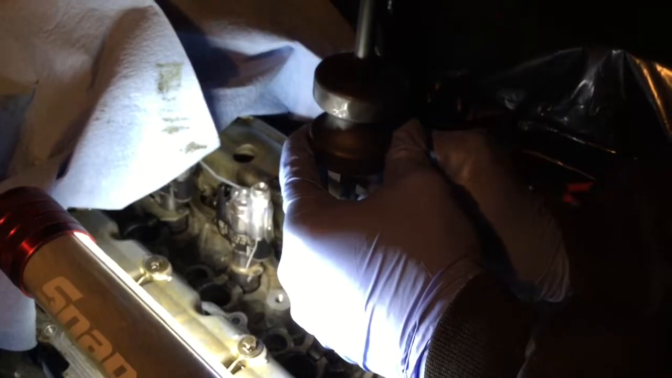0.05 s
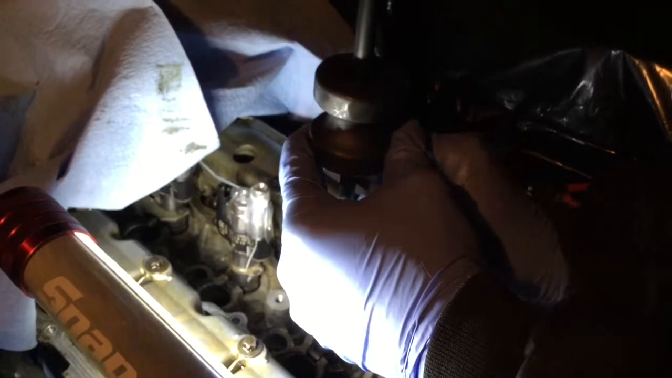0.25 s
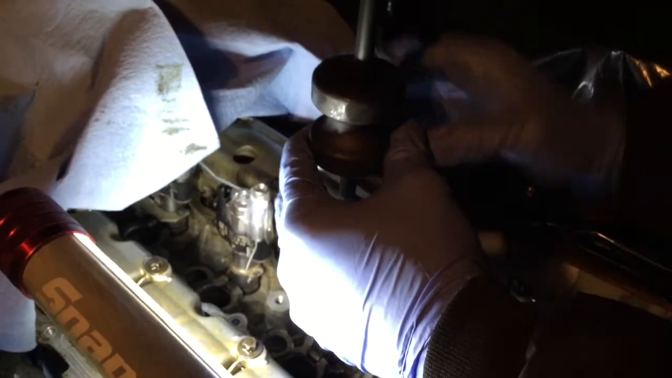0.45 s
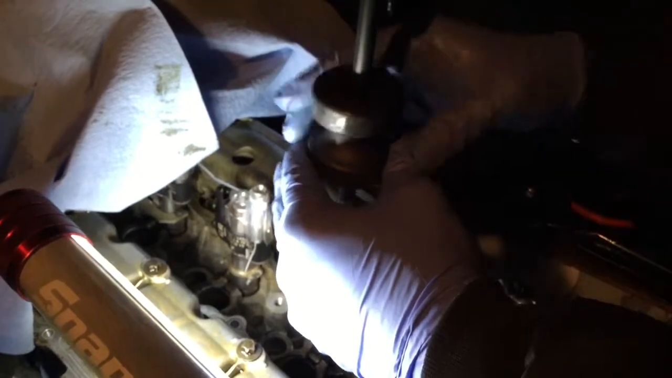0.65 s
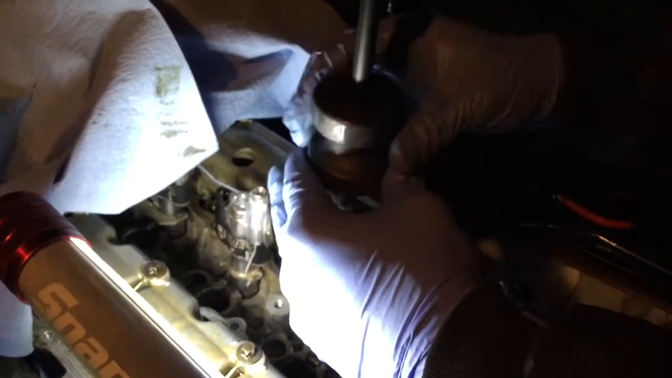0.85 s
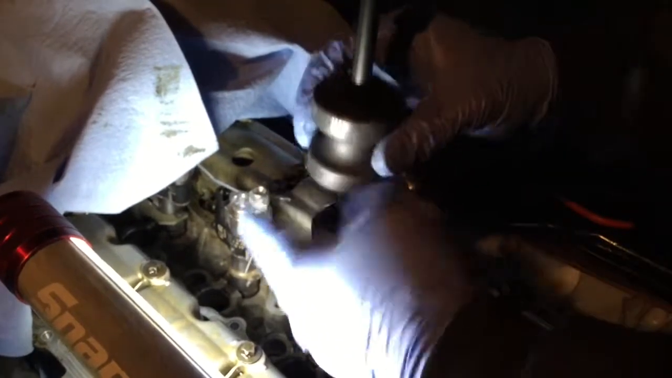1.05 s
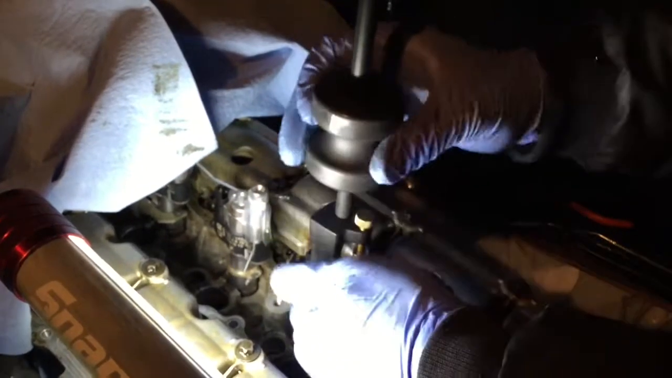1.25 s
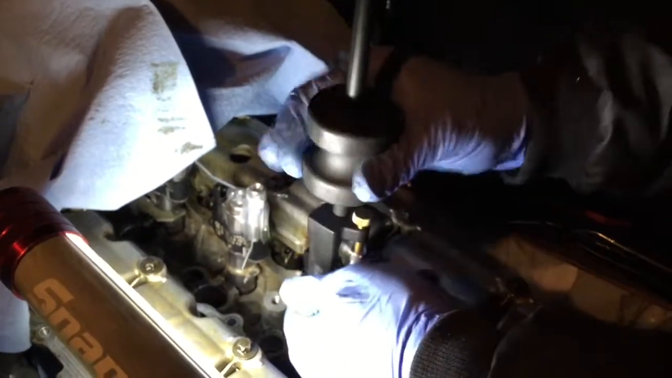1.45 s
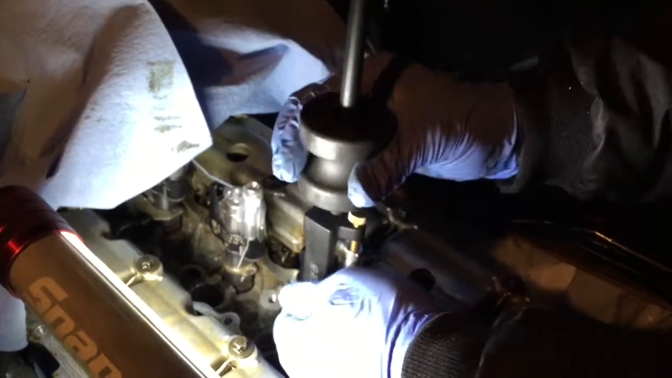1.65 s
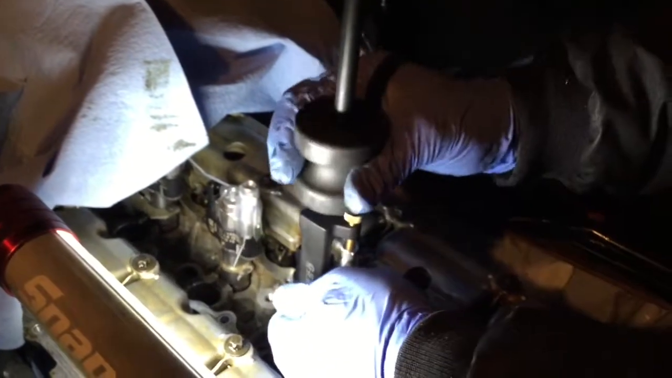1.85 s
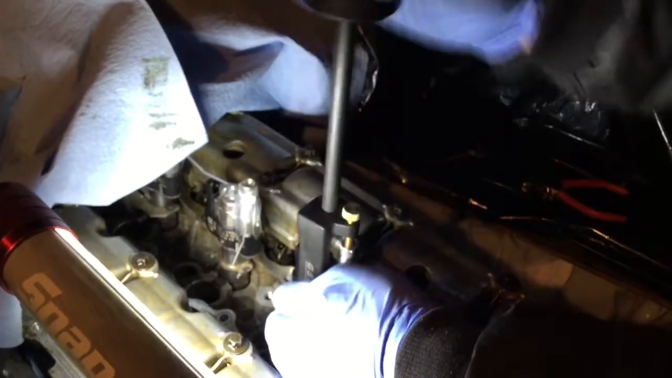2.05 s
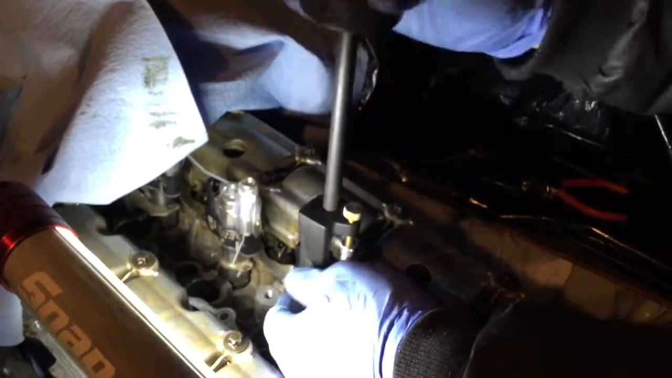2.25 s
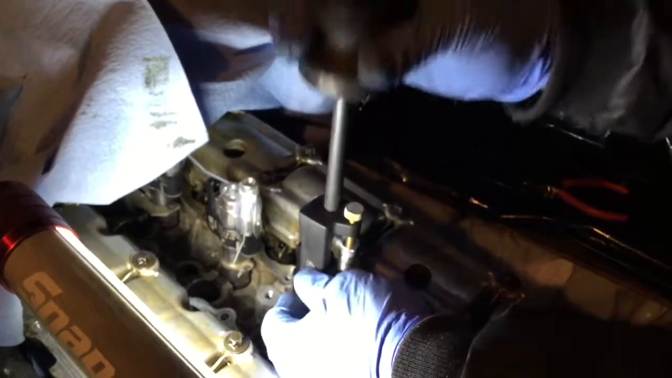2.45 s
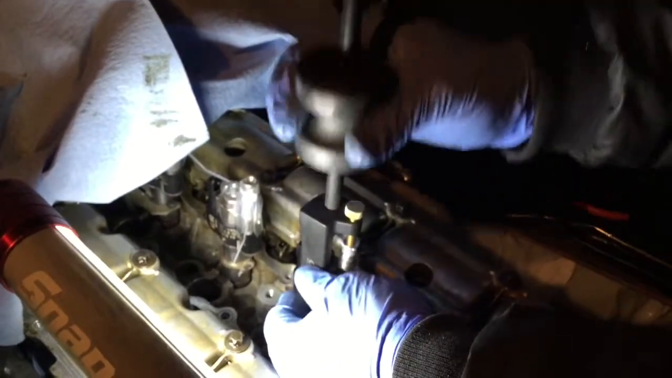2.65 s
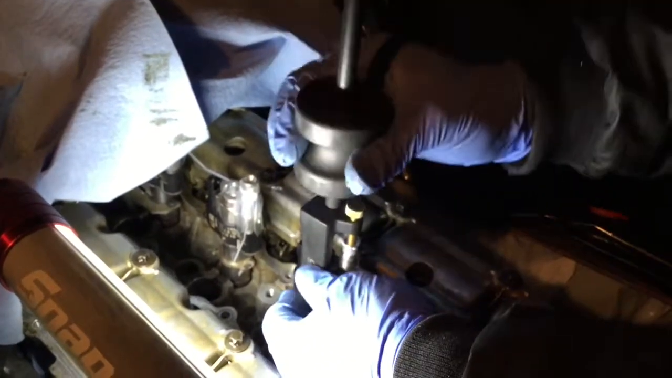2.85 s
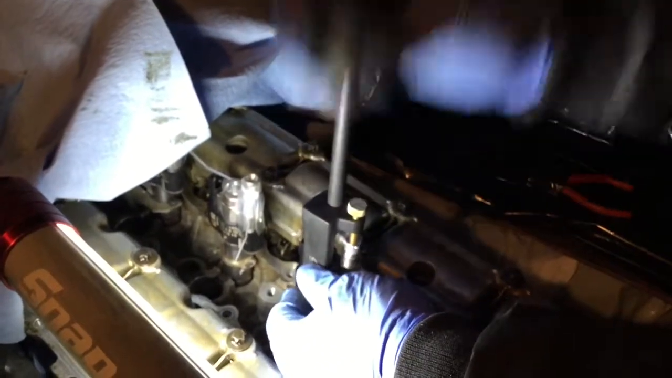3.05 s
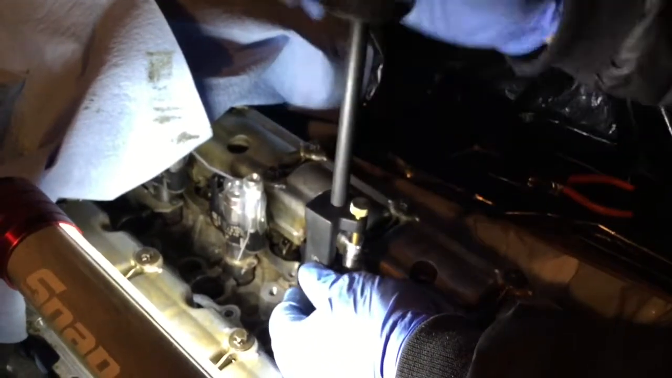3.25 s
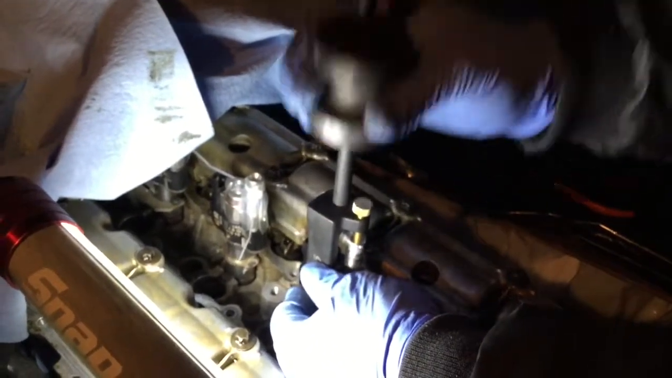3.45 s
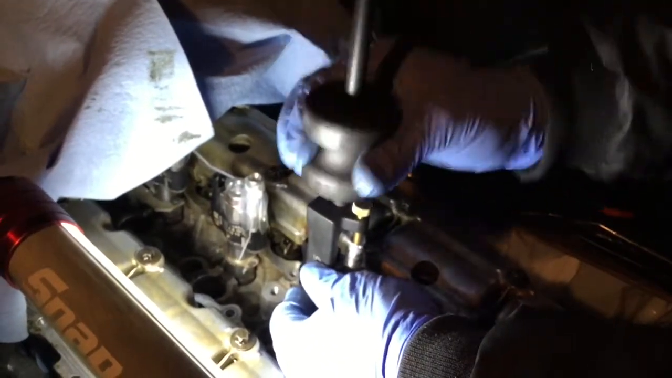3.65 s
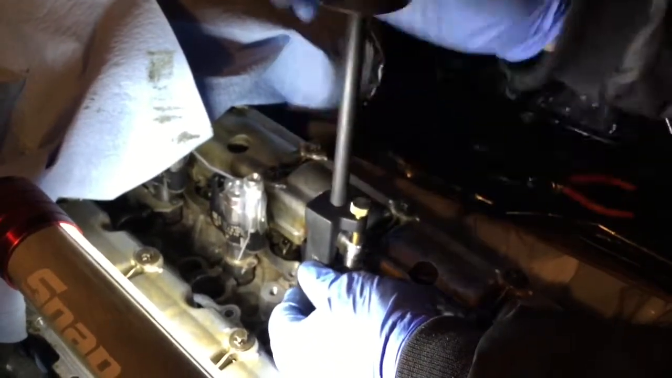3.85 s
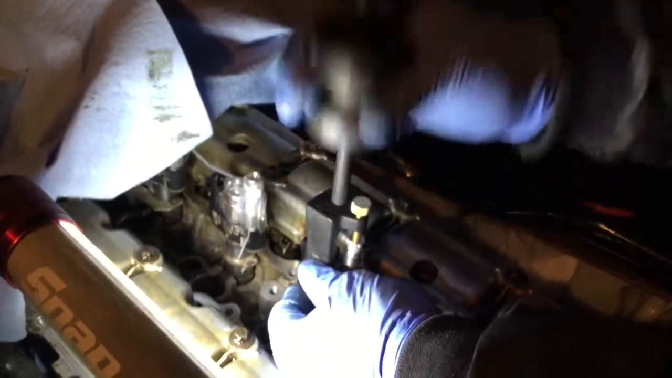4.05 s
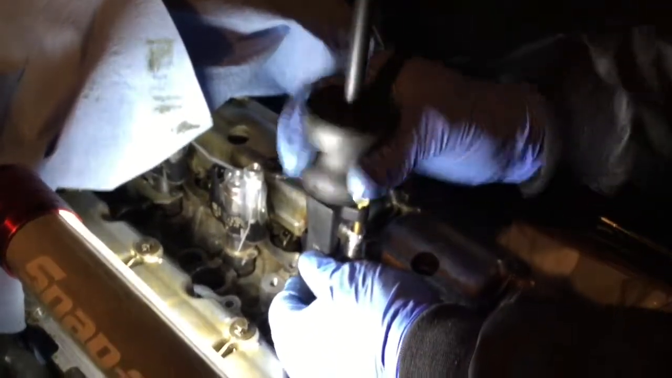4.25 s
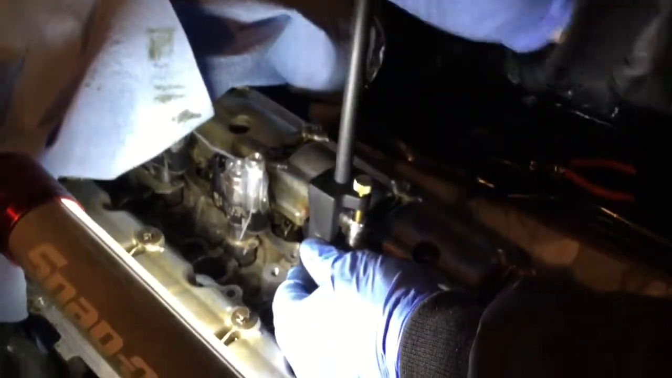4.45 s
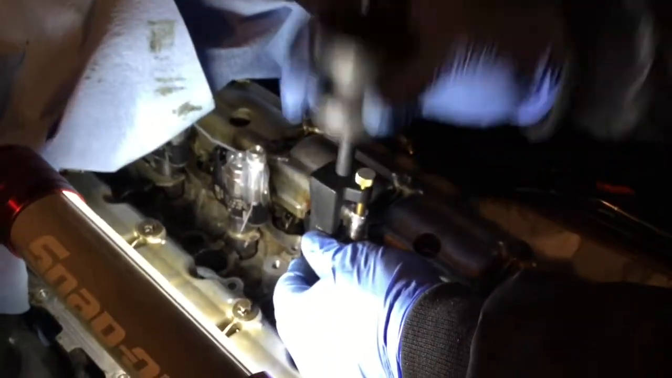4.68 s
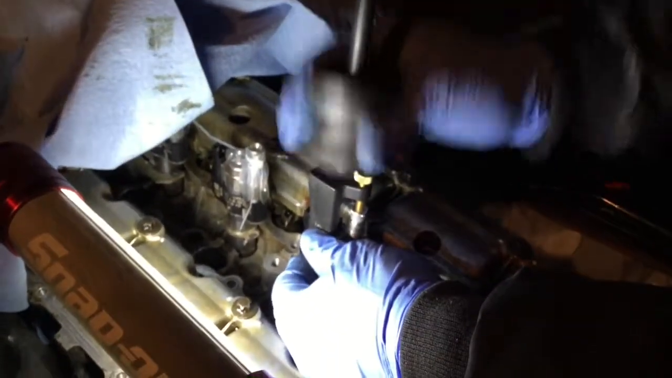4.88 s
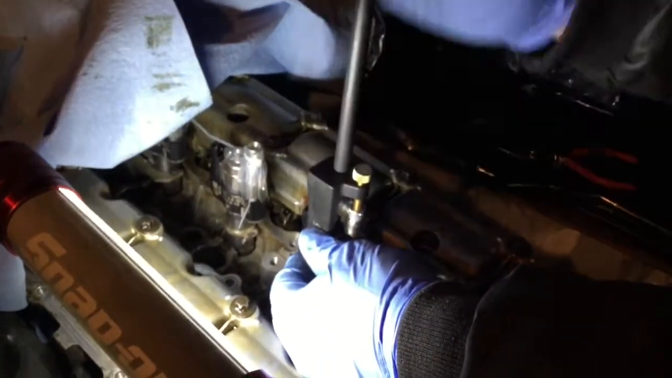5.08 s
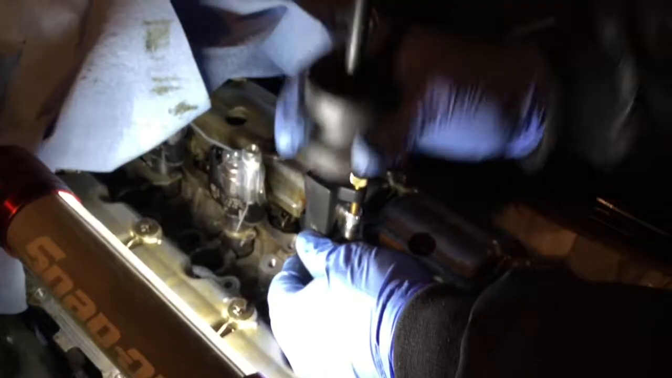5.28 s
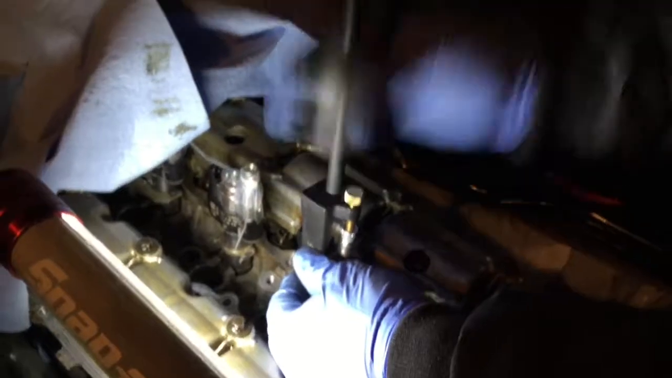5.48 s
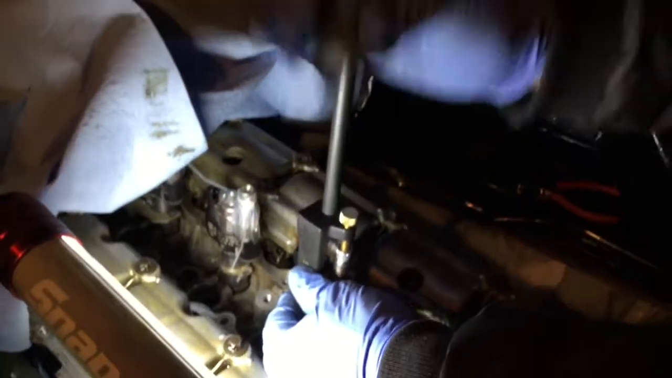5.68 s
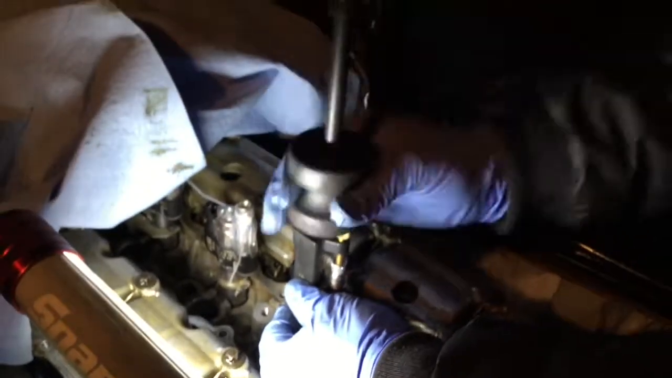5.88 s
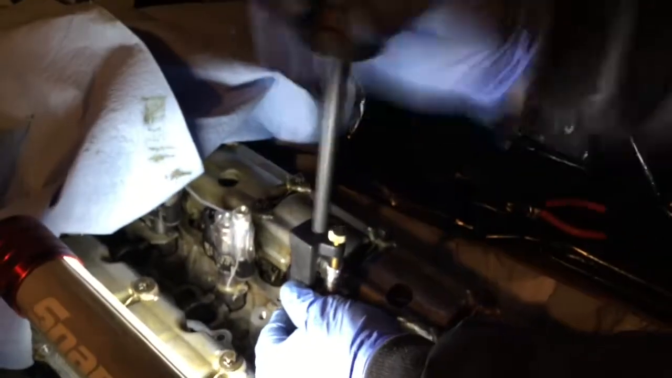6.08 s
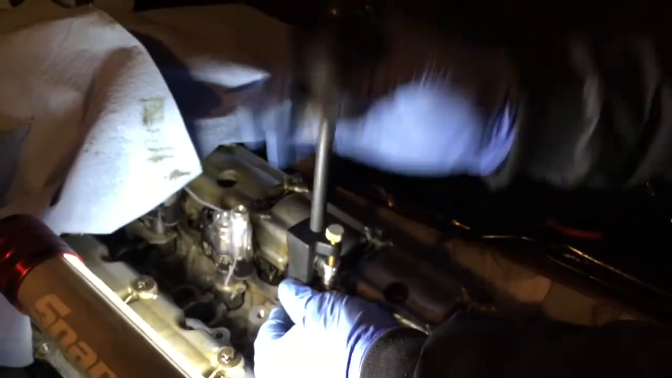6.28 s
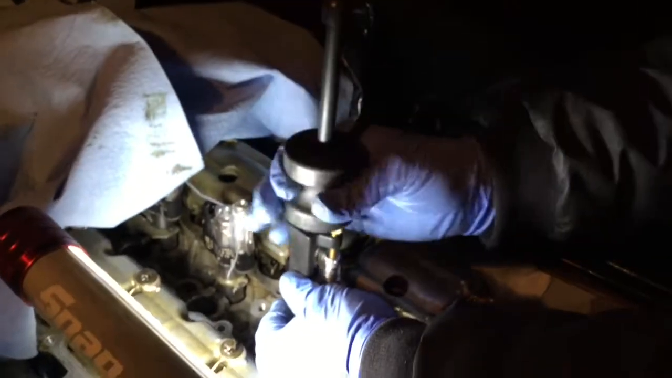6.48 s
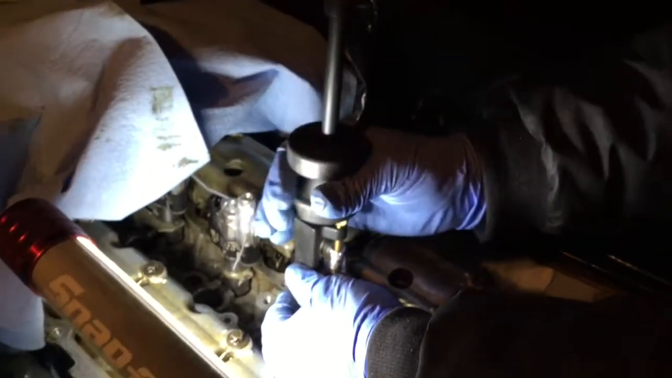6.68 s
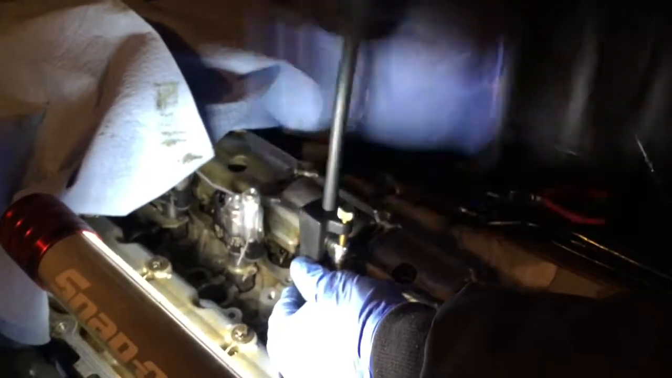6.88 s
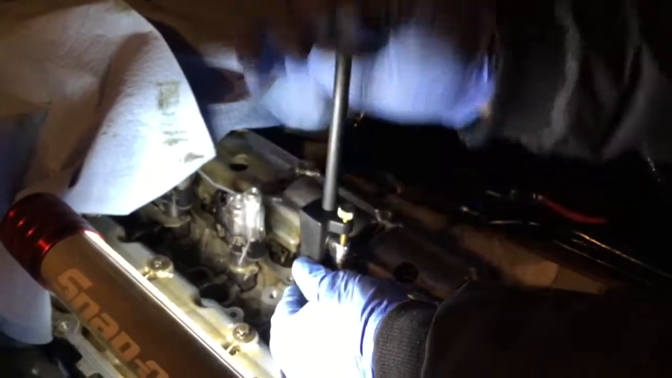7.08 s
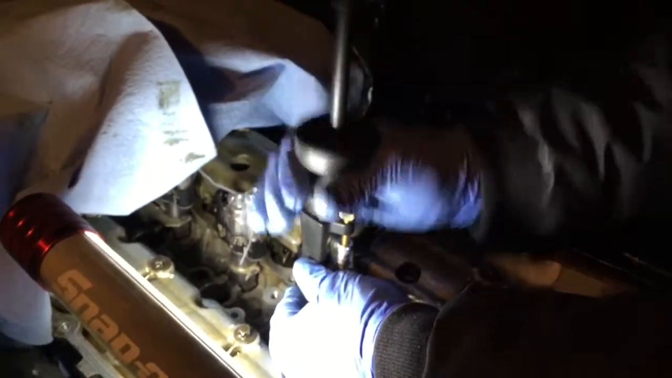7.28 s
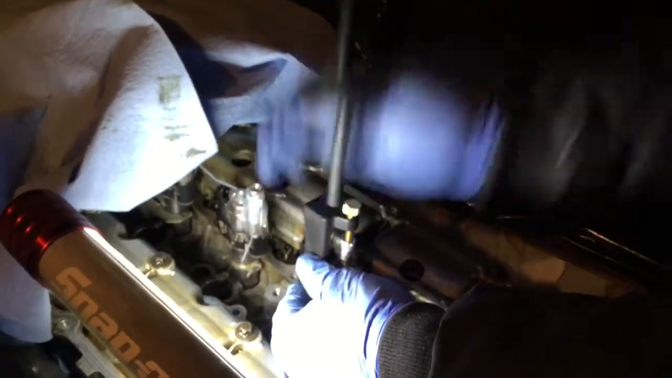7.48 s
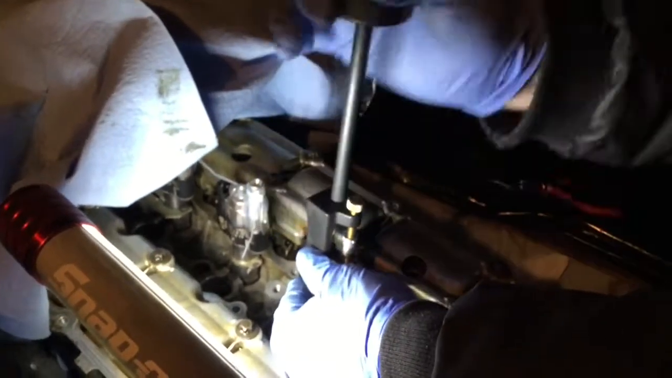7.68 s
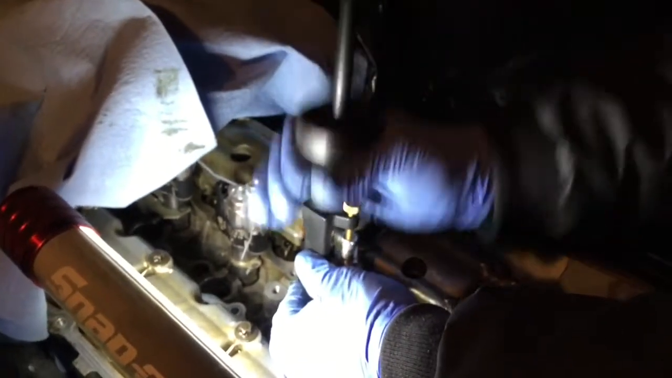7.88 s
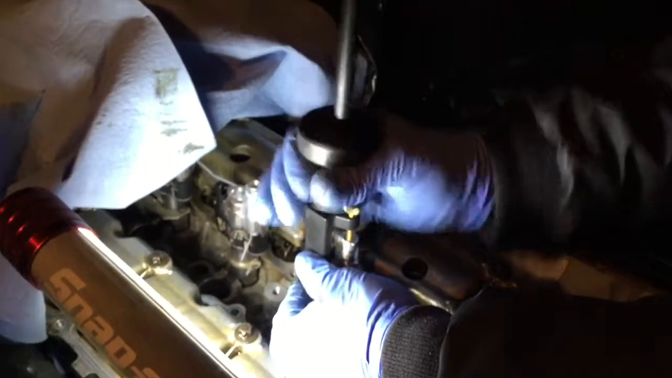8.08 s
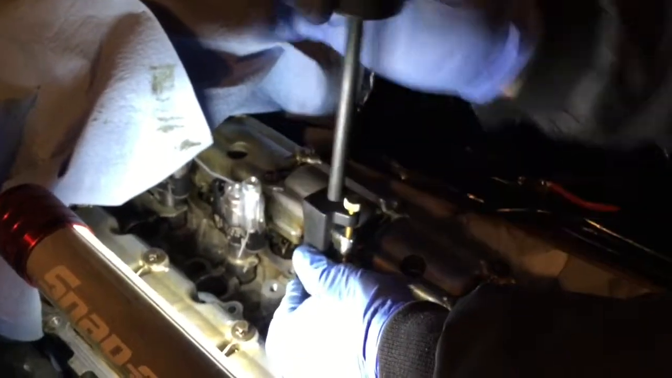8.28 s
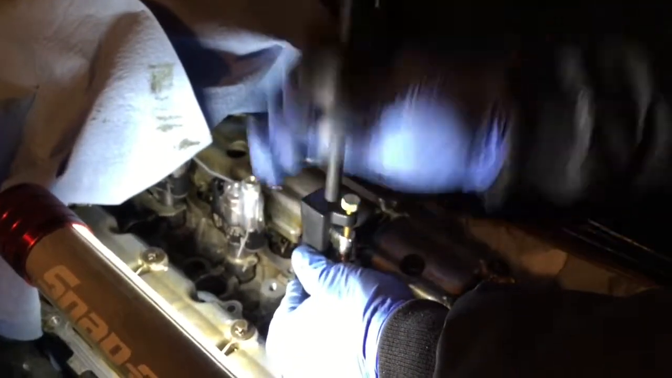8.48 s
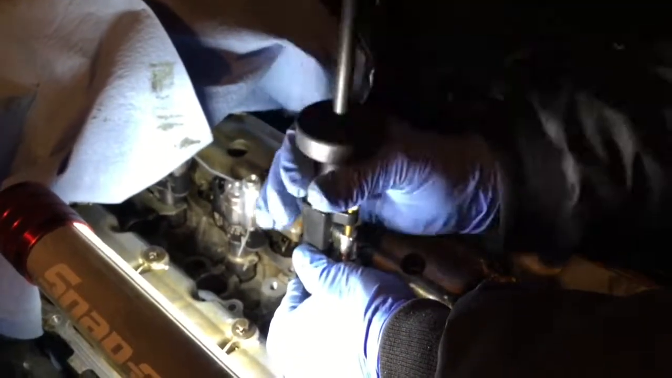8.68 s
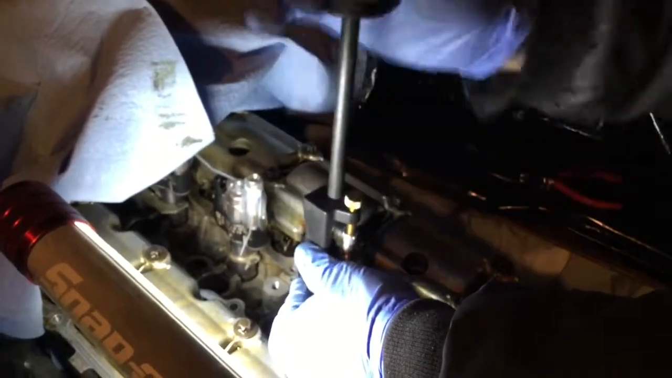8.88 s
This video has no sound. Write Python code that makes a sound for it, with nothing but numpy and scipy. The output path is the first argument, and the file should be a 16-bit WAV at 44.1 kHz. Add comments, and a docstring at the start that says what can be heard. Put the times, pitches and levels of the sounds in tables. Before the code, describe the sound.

Close up in a small garage, a slide hammer tugs at an engine part. After two quiet seconds of hiss and fading low hum, a steel weight rasps up its rod and slams the stop, with an instant recoil knock. Eleven blows follow roughly every 0.6 seconds, later ones harder, with duller clacks as the weight drops back. The microphone overloads and the hiss dips after each bang.

```python
"""In a small garage, a slide hammer pulls a stuck injector from an engine.
Its steel weight scrapes up a rod, slams into the stop, knocks again on recoil and drops back with a clack.
Shaped noise makes the scrapes and cracks, gliding sine swings the jolts, and fading sines the engine's ring.
Behind it lie hiss and a fading hum; the close microphone overloads and its limiter ducks the hiss."""
import sys
import numpy as np
from scipy import signal
from scipy.fft import rfft, irfft, next_fast_len
from scipy.io import wavfile
from scipy.ndimage import uniform_filter1d, minimum_filter1d

SR = 44100
rng = np.random.default_rng(int(sys.argv[2]) if len(sys.argv) > 2 else 0)


def generate_wav(sig):
    """Save sig (samples, or channels by samples) to the path in sys.argv[1] as 16-bit PCM at SR."""
    pcm = np.round(np.clip(np.atleast_2d(sig).T, -1, 1) * 32767).astype(np.int16)
    wavfile.write(sys.argv[1], SR, pcm)


N = 393813  # length of the scene in samples

# Tone colour of the garage hiss: (frequency [Hz], relative level per Hz [dB])
HISS_SPECTRUM = [(20, -43), (45, -17), (90, -9), (145, 0.5), (270, -6.5), (480, -11), (800, -10),
                 (1000, -11), (1700, -7.5), (3500, -16.5), (7000, -26.5), (9500, -23.5), (13000, -21),
                 (16000, -34.5)]
HISS_DB = -42
# Fading of the low hum, before it wavers: (time [s], level [dB])
HUM_FADE = [(0, -46.5), (.5, -50.5), (.85, -54), (2, -56), (8.9, -88)]

# Loudness of the echoes from the garage walls: (frequency [Hz], level [dB])
ECHO_LEVEL = [(60, -14), (200, -6.5), (700, -22), (1500, -13.5), (5000, -12.5), (11000, -10),
              (16000, -10.5)]
# Time the echoes take to fall by 60 dB: (frequency [Hz], time [s])
ECHO_T60 = [(80, 0.11), (400, 0.19), (730, 0.34), (1100, 0.2), (3000, 0.2), (10000, 0.2), (16000, 0.15)]

# Tone colour of the weight sliding on its rod: (frequency [Hz], relative level per Hz [dB])
SCRAPE_SPECTRUM = [(30, -33), (90, -22), (170, 11.5), (450, 3.5), (900, 7.5), (1500, -2), (4000, -8),
                   (5500, 1.5), (8000, 1), (12500, 1.5), (16000, -9)]
# Rod resonances that friction sets off: (frequency [Hz], relative level [dB], width [Hz])
ROD_SQUEAKS = [(3820, 3.5, 300), (7070, -6, 180), (8000, 0, 92), (11750, -2, 270)]
# Scrape before each slam: length, end level relative to the force, and rise towards the end
PULL_S, PULL_DB, PULL_RISE_DB = 0.077, -24.5, 33
# Scrape before each drop: length, end level, and rise (negative: it eases off slightly)
FALL_S, FALL_DB, FALL_RISE_DB = 0.216, -49.5, -4
# Moments when the weight is lowered by hand and arrives without a knock: (time [s])
EASED_TIMES = [2.754, 3.57]
EASED_DB = -58  # end level of these gentle scrapes
SINGING_GROWTH = 0.74  # singing grows with this power of the speed, more slowly than the scrape

# Ringing of the puller and the engine under it: (frequency [Hz], relative level [dB], 60 dB fall time [s])
RING_MODES = [(205, -2, 0.12), (313, -12, 0.2), (501, 5, 0.05), (587, -0.5, 0.071), (715, 2.5, 0.13),
              (738, -5, 0.25), (794, -4, 0.11), (832, -10, 0.26), (1021, -8, 0.13), (1672, -1.5, 0.054),
              (2408, 7, 0.032), (4230, 2, 0.049), (7900, -4, 0.091), (9464, -19, 0.1), (11600, -1, 0.11),
              (13400, -4, 0.15)]

# Tone colour of a light knock: (frequency [Hz], relative level per Hz [dB])
CLACK_SPECTRUM = [(40, -13), (170, 13), (450, 2.5), (650, -5.5), (850, 12), (1150, 6.5), (1450, -4),
                  (1800, 2.5), (3000, -3), (6500, -3.5), (7600, -6.5), (8200, 3), (12500, -8),
                  (16000, -9.5)]
# Weight dropped back on the lower stop: (time [s], force [dB], body ring [dB])
DROP_HITS = [(4.262, -14.5, 5), (4.881, -22.5, 10), (5.42, -19, 5), (5.9691, -9, -3), (6.539, -19, 7.5),
             (7.373, -23.5, 13), (7.9779, -17.5, 7.5), (8.6326, -12, 6.5)]
# Weight wobbling against the rod: (time [s], force [dB], body ring [dB])
ROD_WOBBLES = [(2.0974, -14.5, -23), (2.137, -17.5, 9.5), (3.807, -30.5, -14), (4.402, -30, 7),
               (5.786, -31, -16), (7.939, -28, 1)]
CLACK_T60_S = 0.046  # 60 dB fall time of the clatter in a drop, bounce or wobble
# Each drop settles with one small bounce: delay, force and body ring
BOUNCE_S, BOUNCE_DB, BOUNCE_RING_DB = 0.017, -31.5, 10

# Tone colour of a slam: (frequency [Hz], relative level per Hz [dB])
STEEL_SPECTRUM = [(25, -20), (60, 1.5), (250, -1.5), (700, 3.5), (1200, -0.5), (3000, -3.5), (6500, -6.5),
                  (8500, -3), (12500, -2.5), (16000, -7)]
# Weight slammed against the top stop, before the offsets below: (blow time [s], recoil time [s],
# middle of the random jolt start pitch [Hz], force [dB], low push [dB], mid-range body [dB], engine ring [dB])
SLAM_STROKES = [(2.086, 2.133, 506, -3, -19, -9, -16), (3.158, 3.1874, 522, -0.5, -3.5, -4, 2.5),
                (3.8432, 3.8683, 450, -.5, 2, -4.5, 3.5), (4.4453, 4.4694, 728, 0, -3, 2.5, 1),
                (5.0515, 5.0747, 657, 0.5, 2, 1.5, 3.5), (5.611, 5.629, 600, 2, -6.5, 0.5, -4.5),
                (6.1631, 6.18, 600, 1, -2.5, 3, 3), (6.948, 6.966, 440, 2.5, 2.5, 3.5, -1),
                (7.5775, 7.595, 544, 2.5, 0.5, -0.5, 1), (8.231, 8.2468, 586, 3, -0.5, 0.5, 1.5),
                (8.8849, 8.901, 510, 2, -0.5, 1.5, 5)]
# Offsets of the blow and of its recoil knock: force, low push, mid-range body, engine ring, all in dB
BLOW, RECOIL = (0.5, 0, 2, -7.5), (0, 0.61, 1.4, 0)
# The sooner the recoil, the longer the clatter: 60 dB fall times at zero delay, and the
# delay that shortens them to about 37 percent
BLOW_T60_S, RECOIL_T60_S, CLATTER_DELAY_S = 0.08, 0.083, 0.035


def amp(db):
    """Turns decibels into a gain."""
    return 10 ** (np.asarray(db) / 20)


def unit(x):
    """Scales a sound to an average (rms) strength of 1."""
    return x / np.sqrt(np.mean(x ** 2) + 1e-20)


def read(points, hz):
    """Reads a table between its points, with pitch spaced by ratio as we hear it."""
    table_hz, value = np.transpose(points)
    return np.interp(np.log(hz + 1), np.log(table_hz + 1), value)


def add(mix, start_s, sound):
    """Mixes a sound in at a given time."""
    part = mix[max(round(start_s * SR), 0):][:len(sound)]
    part += sound[:len(part)]


def flutter(count):
    """A random wavering curve around zero, drawn with straight lines between this many points."""
    return np.interp(np.arange(N), np.linspace(0, N, count), rng.standard_normal(count))


def noise(spectrum, size, ripple_db=0):
    """Random vibration with a given tone colour; ripple makes some resonances stand out."""
    hz = np.fft.rfftfreq(next_fast_len(size, True), 1 / SR)
    ripple = np.interp(hz, np.linspace(0, SR / 2, 110), rng.standard_normal(110))
    waves = rng.standard_normal(len(hz)) + 1j * rng.standard_normal(len(hz))
    level = amp(read(spectrum, hz) + ripple_db * ripple)
    return unit(irfft(waves * level)[:size])


def background():
    """Steady garage hiss from shaped noise, with a low, wavering sine hum that fades."""
    t = np.arange(N) / SR
    waver = flutter(count=80)
    hum_level = amp(np.interp(t, *np.transpose(HUM_FADE)) + 0.97 * waver)
    hum = hum_level * np.sin(2 * np.pi * 64.6 * t + 0.4 * waver)
    return amp(HISS_DB) * noise(HISS_SPECTRUM, N) + hum


def garage(x, blur=0.022, patchy_db=0.5):
    """Blurred echoes: the power of each pitch band builds up in the room and dies at its own speed."""
    hz, t, bands = signal.stft(x, SR, nperseg=256)
    # echoes from all sides even out the colour
    spread = np.exp(-0.5 * ((hz[:, None] - hz) / (blur * hz[:, None] + 1)) ** 2)
    power = (spread / spread.sum(1, keepdims=True)) @ abs(bands) ** 2
    # share of the power that survives from one time step to the next
    keep = amp(-60 * t[1] / read(ECHO_T60, hz)) ** 2
    stored = np.array([signal.lfilter([0, 1 - k], [1, -k], band) for k, band in zip(keep, power)])
    wash = signal.stft(rng.standard_normal(N), SR, nperseg=256)[2]
    # some bands ring on, others cancel
    patches = unit(uniform_filter1d(rng.standard_normal(bands.shape), size=40, axis=1))
    wash *= np.sqrt(stored / np.mean(abs(wash) ** 2))
    wash *= amp(read(ECHO_LEVEL, hz)[:, None] + patchy_db * patches)
    return signal.istft(wash, SR, nperseg=256)[1][:N]


def sliding_speed():
    """The weight speeds up into each slam, the more the harder it hits, and glides back almost evenly."""
    pulls = [(s, PULL_S, force_db + PULL_DB, PULL_RISE_DB) for s, _, _, force_db, *_ in SLAM_STROKES]
    falls = [(s, FALL_S, FALL_DB, FALL_RISE_DB) for s, _, _ in DROP_HITS]
    eased = [(s, FALL_S, EASED_DB, FALL_RISE_DB) for s in EASED_TIMES]
    speed = np.zeros(N)
    for arrival, length, end_db, rise_db in pulls + falls + eased:
        progress = np.linspace(0, 1, int(length * SR))
        slide = amp(end_db + rise_db * (progress - 1))
        fade_in = np.minimum(1, 8 * progress)
        fade_out = np.minimum(1, 60 * (1 - progress))
        add(speed, arrival - length, slide * fade_in * fade_out)
    return speed


def slides(grain_db=2, stick_db=2, singing_db=8.0):
    """Friction grows with the speed of the weight; now and then it makes the rod sing."""
    size = next_fast_len(N, True)
    hz = np.fft.rfftfreq(size, 1 / SR)
    friction = rfft(rng.standard_normal(size))
    singing = np.zeros(N)
    for mode_hz, db, width_hz in ROD_SQUEAKS:
        level = amp(db + singing_db * flutter(count=350))
        resonance = 1 / (1 + ((hz - mode_hz) / width_hz) ** 2)
        singing += level * unit(irfft(friction * resonance)[:N])
    roughness_db = grain_db * flutter(count=2000) + stick_db * flutter(count=250)
    scrape = amp(roughness_db) * noise(SCRAPE_SPECTRUM, N)
    speed = sliding_speed()
    return amp(-4.0) * speed * scrape + amp(-15.5) * speed ** SINGING_GROWTH * unit(singing)


def clatter(t, spectrum, t60, contact, rise, chatter_db):
    """Steel on steel: dense resonances, driven while the faces chatter in contact, then dying fast."""
    chatter = unit(uniform_filter1d(rng.standard_normal(len(t)), size=70))
    fall_db = -60 * np.maximum(t - contact, 0) / t60
    crack = noise(spectrum, len(t), ripple_db=4.5)
    return crack * amp(fall_db + chatter_db * chatter) * (1 - np.exp(-t / rise))


def ring(t, drive, rise, spread_db):
    """Ringing tones set off by a knock of a given colour; each knock shares its energy out differently."""
    chance = rng.standard_normal((len(RING_MODES), 2))
    tones = np.zeros(len(t))
    for (hz, db, t60), (luck, phase) in zip(RING_MODES, chance):
        level_db = db + read(drive, hz) + spread_db * luck - 60 * t / t60
        tones += amp(level_db) * np.sin(2 * np.pi * (hz * t + phase))
    return tones * (1 - np.exp(-t / rise))


def push(t, start_hz, end_hz, sag, peak):
    """The jolt of a knock: a few heavy swings that slow down as they die."""
    start_hz = start_hz * rng.uniform(0.84, 1.126)
    hz = end_hz + (start_hz - end_hz) * np.exp(-t / sag)
    swing = np.sin(2 * np.pi * np.cumsum(hz) / SR)
    return swing * t / peak * np.exp(1 - t / peak)


def clacks(damping_db_per_s=170):
    """Lighter, duller knocks; the hand on the weight damps their ring."""
    out, t = np.zeros(N), np.arange(SR // 4) / SR
    bounces = [(s + BOUNCE_S, BOUNCE_DB, BOUNCE_RING_DB) for s, _, _ in DROP_HITS]
    for s, force_db, ring_db in DROP_HITS + bounces + ROD_WOBBLES:
        crack = clatter(t, CLACK_SPECTRUM, CLACK_T60_S, contact=0.0016, rise=0.00059, chatter_db=1.2)
        thud = amp(-13.5) * push(t, start_hz=298, end_hz=181.7, sag=0.0064, peak=0.0064)
        tone = amp(-16 - damping_db_per_s * t) * ring(t, CLACK_SPECTRUM, rise=0.011, spread_db=2.5)
        add(out, s, amp(force_db) * (crack + amp(ring_db) * (thud + tone)))
    return out


def slams():
    """Hard blows on the top stop, each followed by its recoil knock: crack, jolt and ring."""
    out, t = np.zeros(N), np.arange(SR // 4) / SR
    hz, steel_db = np.transpose(STEEL_SPECTRUM)
    # a square hit drives the engine's mid range harder: a broad hump around 1000 Hz
    mid_range = np.exp(-0.5 * (np.log2(hz / 1000) / 2.7) ** 2)
    for s, recoil_s, jolt_hz, *levels in SLAM_STROKES:
        for at, offsets, longest in (s, BLOW, BLOW_T60_S), (recoil_s, RECOIL, RECOIL_T60_S):
            force_db, push_db, body_db, ring_db = np.add(levels, offsets)
            t60 = longest * np.exp((s - recoil_s) / CLATTER_DELAY_S)
            spectrum = np.column_stack([hz, steel_db + body_db * mid_range])
            crack = clatter(t, spectrum, t60, contact=0.002, rise=0.00091, chatter_db=0.5)
            jolt = push(t, start_hz=jolt_hz, end_hz=46.3, sag=0.0056, peak=0.0036)
            tone = ring(t, STEEL_SPECTRUM, rise=0.00034, spread_db=1.5)
            add(out, at, amp(force_db) * crack + amp(push_db - 6) * jolt + amp(ring_db - 20) * tone)
    return out


def scene():
    """The tool, its echoes and the background."""
    tool = slams() + clacks() + slides()
    return (tool + garage(tool) + background())[None]


def limiter(x, threshold_db=-12, share=0.38, hold=0.18, recover_db_per_s=140, attack=0.0012):
    """Gain drops within a blow, holds for a moment, then recovers quickly."""
    power = signal.lfilter([1 / 128], [1, 1 / 128 - 1], x ** 2)  # averaged over about 128 samples
    power_db = 10 * np.log10(abs(power) + 1e-12)
    over_db = share * np.maximum(power_db - threshold_db, 0)
    # keep the largest cut of the last hold seconds
    half = int(hold * SR / 2)
    held_db = -minimum_filter1d(-over_db, 2 * half + 1, origin=half, mode="constant")
    # the cut may shrink no faster than the recovery slope
    fall = np.arange(N) * recover_db_per_s / SR
    cut_db = np.maximum.accumulate(held_db + fall) - fall
    smooth = np.exp(-1 / (attack * SR))
    return x * amp(-signal.lfilter([1 - smooth], [1, -smooth], cut_db))


def record(dry):
    """Microphone bass cut, limiter, overload that rounds the peaks, then a treble cut."""
    bass_cut = signal.butter(3, 44, "highpass", fs=SR, output="sos")
    heard = signal.sosfilt(bass_cut, dry[0])
    loud = np.tanh(limiter(heard))
    treble_cut = signal.firwin(511, 15950, window=("kaiser", 8), fs=SR)  # edge at 15950 Hz
    return signal.oaconvolve(loud, treble_cut, "same")[None]


dry = scene()
out = record(dry)
generate_wav(out)
```